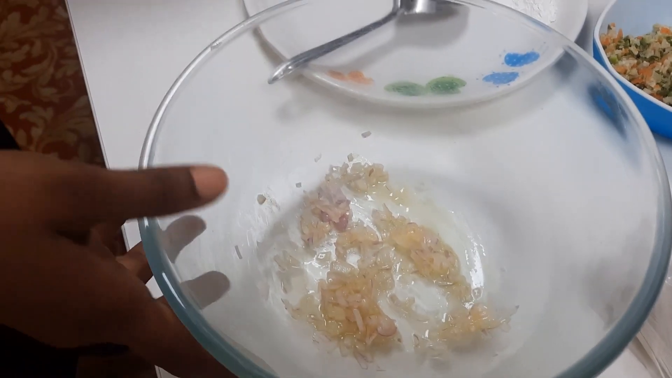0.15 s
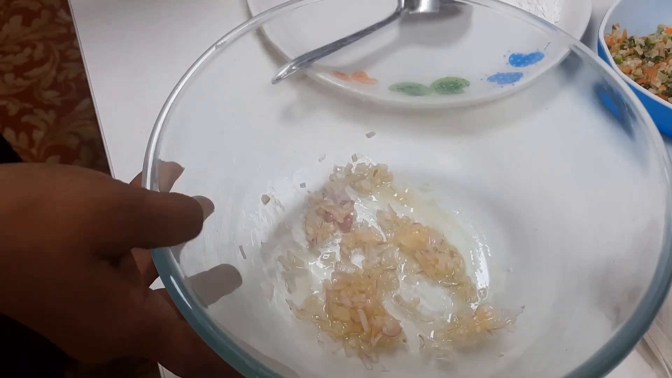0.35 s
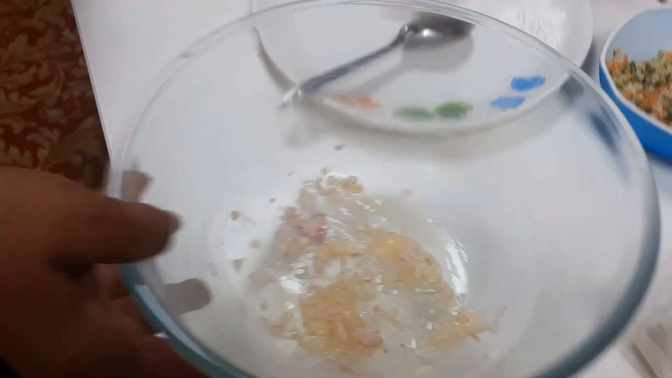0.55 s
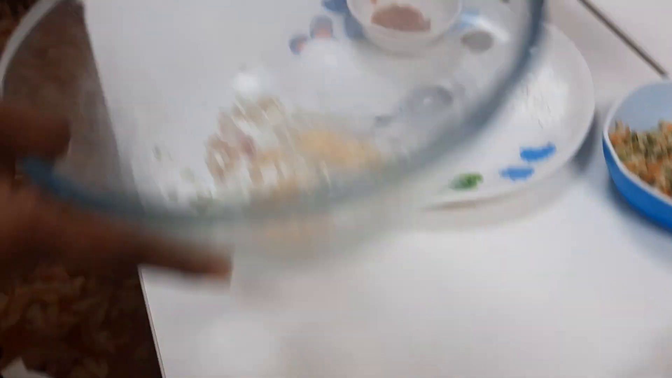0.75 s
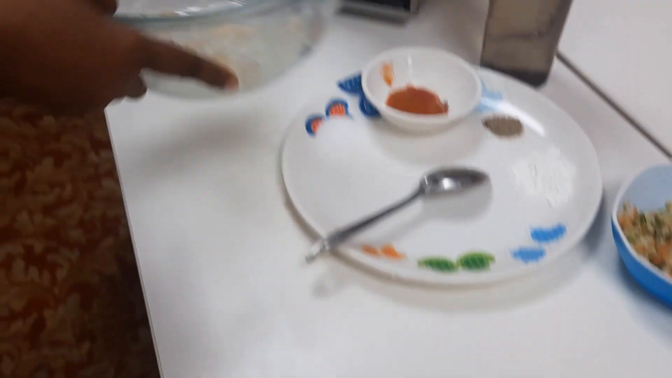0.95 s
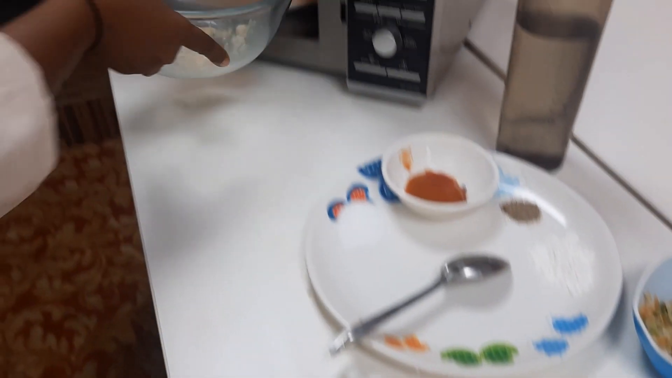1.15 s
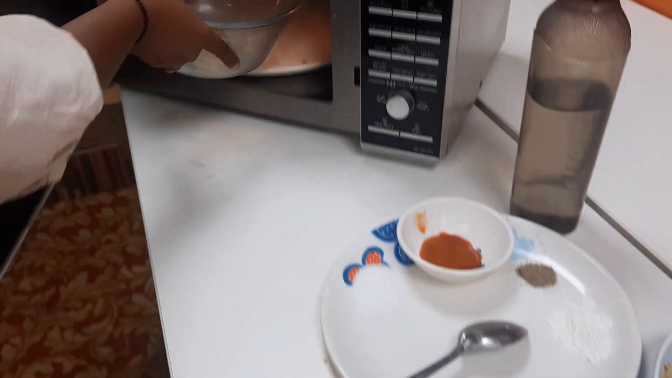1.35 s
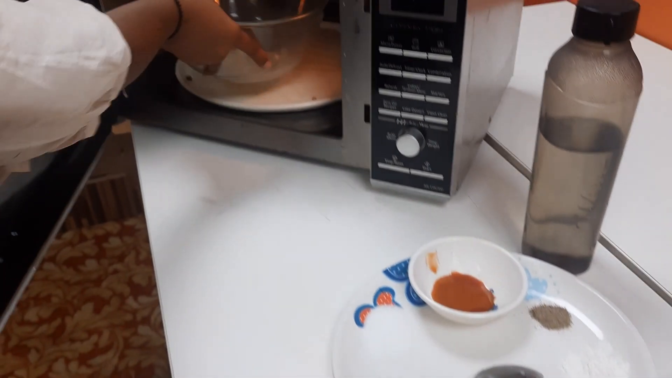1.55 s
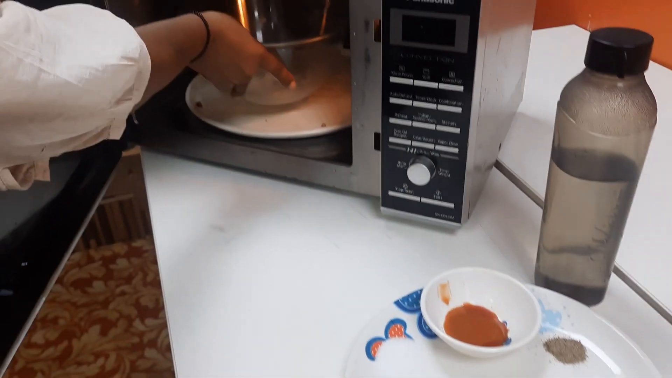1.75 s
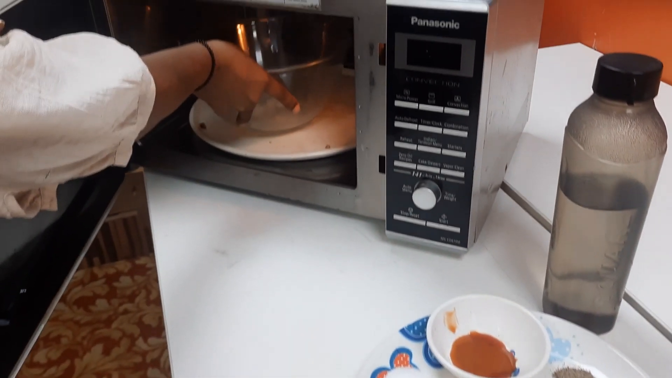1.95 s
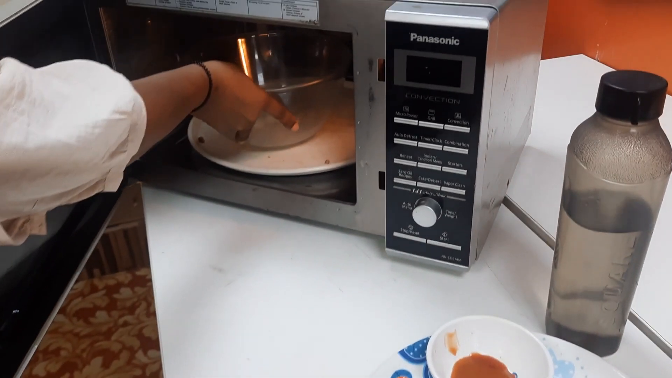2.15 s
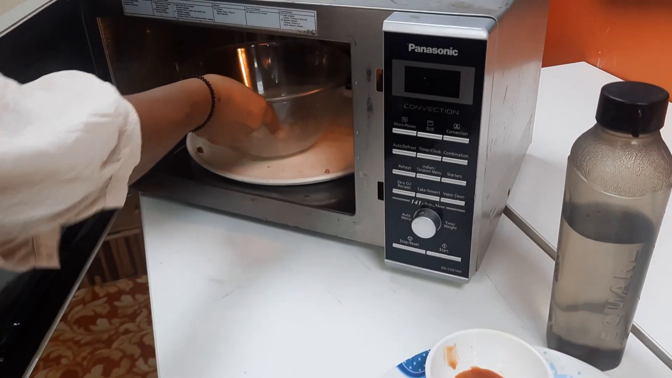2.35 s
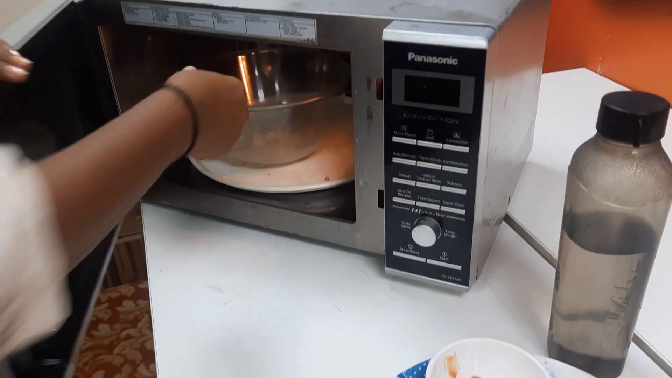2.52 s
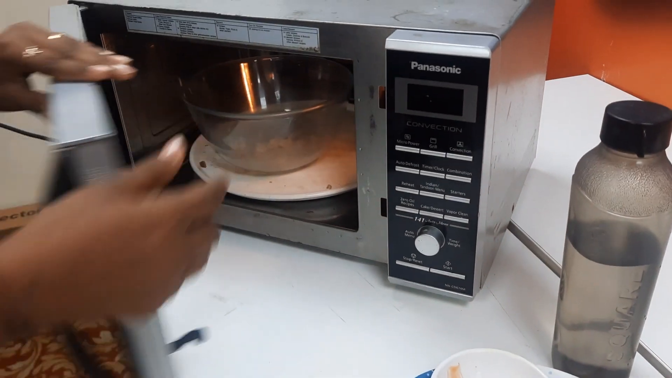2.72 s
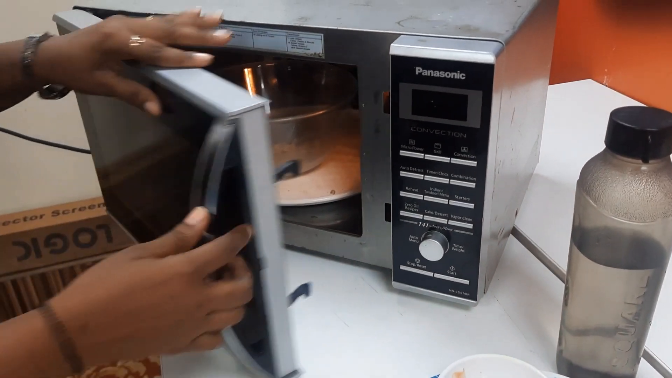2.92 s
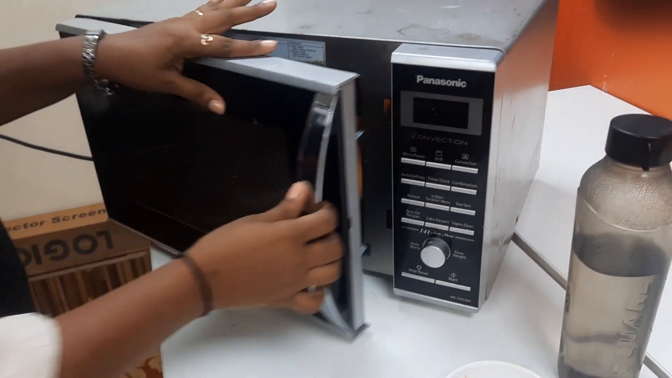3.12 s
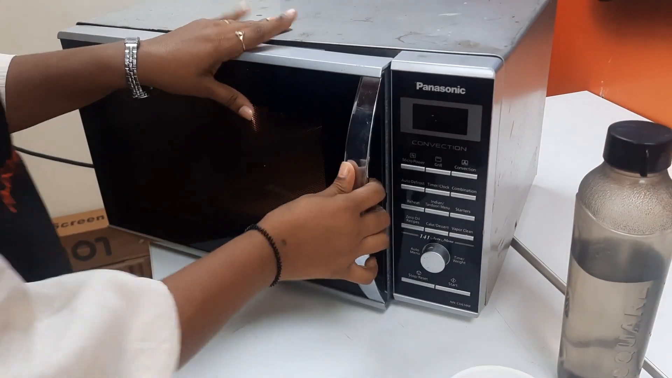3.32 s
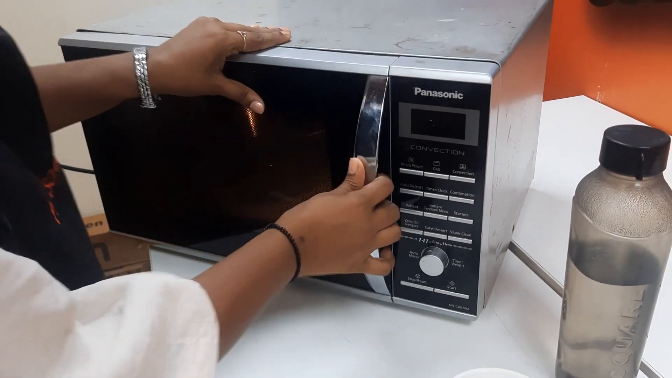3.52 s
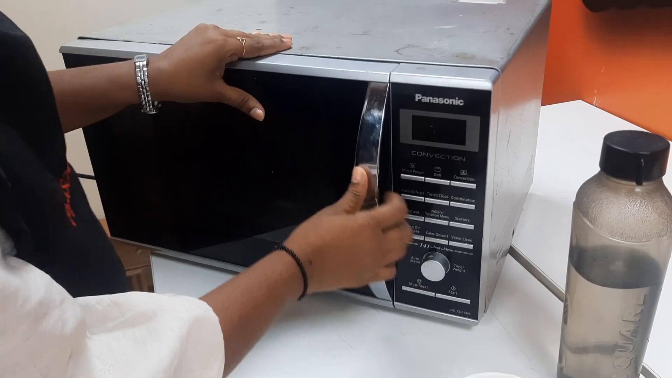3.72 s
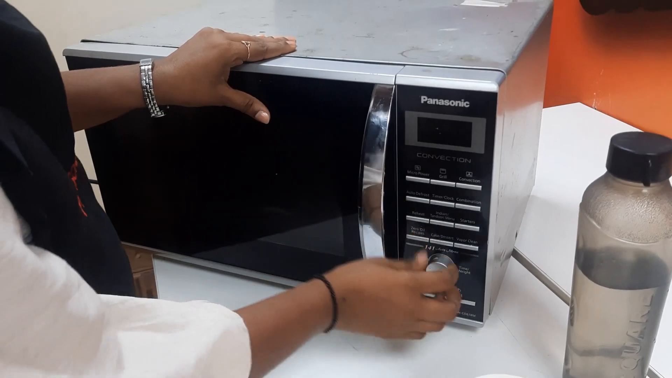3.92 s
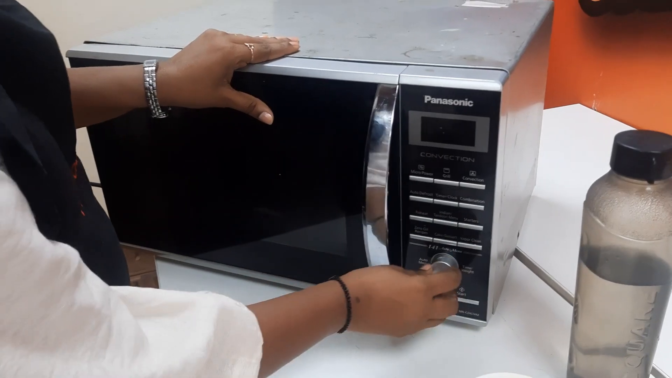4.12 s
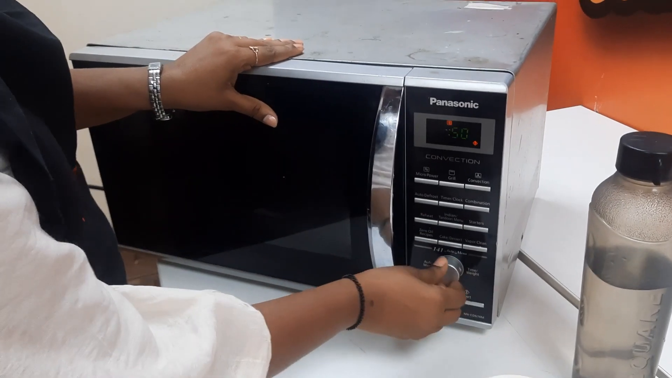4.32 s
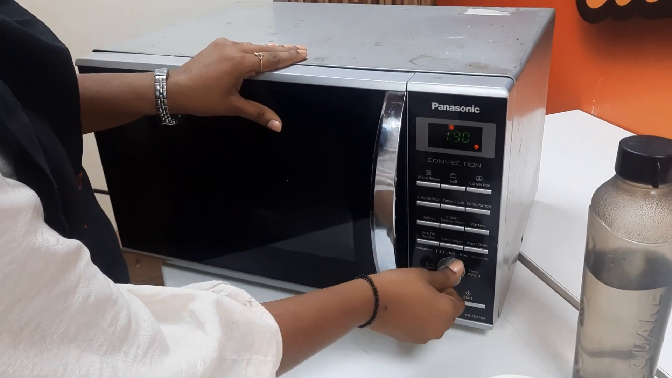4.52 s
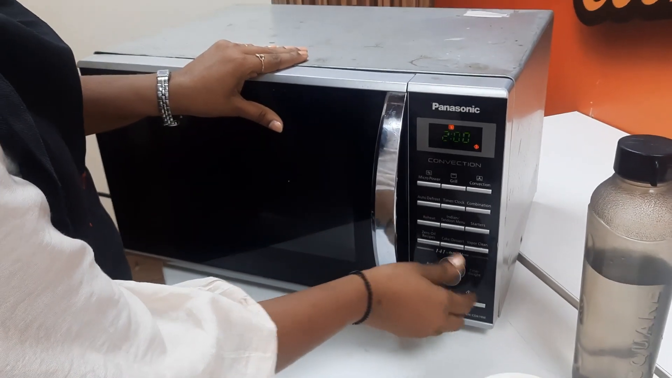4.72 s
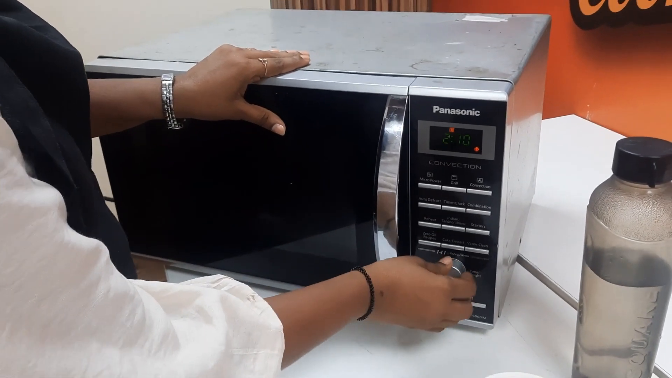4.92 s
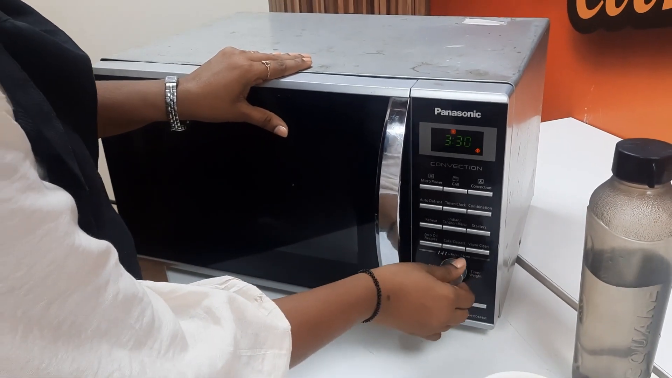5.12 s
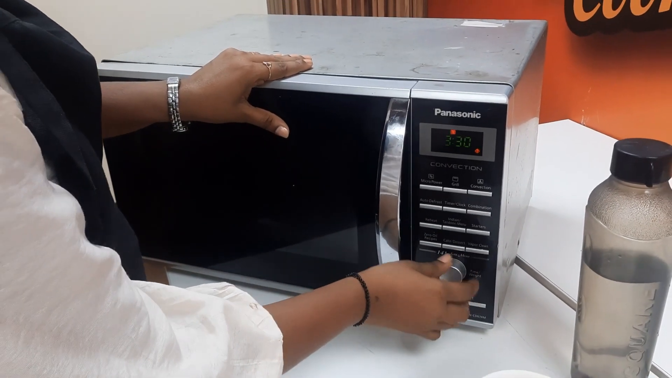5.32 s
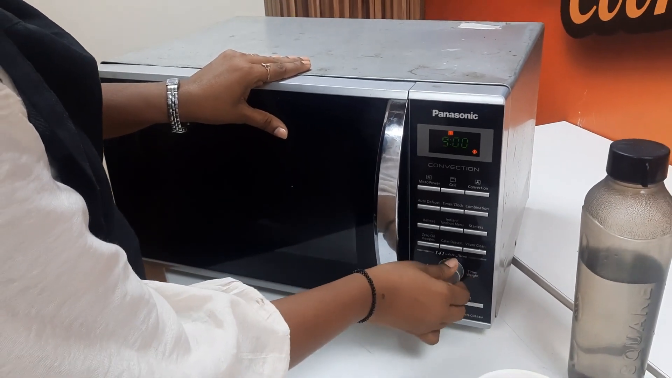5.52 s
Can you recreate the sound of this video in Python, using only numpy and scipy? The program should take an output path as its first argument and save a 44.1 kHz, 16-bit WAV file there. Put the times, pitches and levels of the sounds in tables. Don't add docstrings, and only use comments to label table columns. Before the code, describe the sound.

A glass bowl clunks and rocks onto a glass plate, then an oven door slams and a dial ticks faintly over a fridge hum.

```python
import sys
import numpy as np
from scipy import signal
from scipy.fft import rfft, irfft
from scipy.io import wavfile
from scipy.ndimage import uniform_filter1d

SR = 44100
rng = np.random.default_rng(int(sys.argv[2]) if len(sys.argv) > 2 else 0)


def transcribe(u):
    v = np.clip(np.atleast_2d(u).T, -1, 1)
    q = np.round(v * 32767).astype(np.int16)
    wavfile.write(sys.argv[1], SR, q)


def volts(x):
    e = np.asarray(x, float) / 20
    return 10 ** e


N = 250047

# pitch in Hz, level in dB per Hz.
AIR_COLOUR = [(20, -28), (34, -12), (70, -21), (101, 1), (126, -10), (233, -17), (292, -13.5), (317, -19.5),
              (419, -28), (1180, -45), (6650, -46.5), (15800, -49)]
# pitch in Hz, width in Hz, level in dB.
HUM_LINES = [(50, 11, -10), (64.5, 9.8, -11), (96, 7, -0.5), (290, 54, -10), (376, 14, -23),
             (1140, 12, -45.5), (2750, 20, -52.5)]
# pitch in Hz, left-right likeness from 0 to 1.
PORT_LIKENESS = [(60, 1), (180, 0.93), (400, .9), (700, 0.51), (1650, 0.18), (5000, 0.), (15000, 0.24)]

# start in seconds, hold in seconds, effort in dB, brightness in dB, low drag in dB.
RUB_STROKES = [(0.186, .01, -49, -9.5, -37), (0.271, .08, -61.5, 0, -46.5), (.412, .1, -55, -8, -49),
               (0.57, .02, -47, -12, -35.5), (0.722, .09, -61.5, -1, -46), (0.848, .03, -51.5, -2.5, -49.5),
               (1.02, .24, -82, 11, -66), (2.43, .11, -61, -10, -48), (2.628, .02, -53, -9, -61),
               (2.76, .11, -64, -6, -74), (2.994, .1, -60, -12.5, -47), (3.238, .07, -54, -10, -49),
               (3.359, .005, -39.5, -15.5, -37), (3.409, .1, -50.5, -14.5, -39),
               (3.545, .02, -35, -7.5, -37.5), (4.1, .18, -66, -28, -57), (4.521, .02, -57, -13, -60.5),
               (4.617, .03, -58, -18, -60), (5.029, .03, -56.5, -14.5, -54.5), (5.52, .08, -58, -12, -55)]
# start in seconds, hold in seconds, effort in dB,
# brightness in dB, low drag in dB.
DOOR_SHIVER = (3.7, .03, -39.5, -20, -35)
# pitch in Hz, level in dB per Hz.
RUB_BODY = [(400, -31), (700, 7.5), (1300, 7.5), (2200, 2.5), (3000, -6.5), (15500, -38)]
# pitch in Hz, level in dB per Hz.
RUB_HISS = [(2200, -29), (3500, 0.5), (6500, 10), (9000, -5.5), (13000, -7), (15500, -4)]
# pitch in Hz, level in dB per Hz.
RUB_DRAG = [(60, -29), (130, 0.5), (280, 4.5), (400, -4.5), (600, -7), (1000, -50.5)]

# start in seconds, peak in dB, pitch in Hz, time to fall 60 dB in seconds.
SOFT_PUSHES = [(0.031, -26, 152.5, 0.48), (.075, -43.5, 4493, .4), (.56, -24, 397, .08),
               (0.58, -33.5, 361, 0.21), (0.567, -45, 996, 0.097), (.836, -49, 3150, .12),
               (1.31, -45, 386, 0.19), (2.077, -11, 711, .05), (2.172, -10, 701, 0.021),
               (2.179, -12.5, 781.5, 0.045), (2.175, -18, 323, 0.17), (2.271, -22, 300, 0.21),
               (2.323, -23, 300, 0.23), (2.563, -56, 6500, .03), (2.991, -38.5, 356, 0.11),
               (3.43, -29, 151.2, 0.33), (3.518, -27, 152, 0.23), (3.5655, -5, 153.8, 0.11),
               (3.581, -19, 144, .09), (3.601, -12.5, 323, .27), (4.775, -67, 590, .45),
               (5.422, -67, 1900, .09), (4.981, -45, 1700, 0.047), (5.47, -40, 106.7, .5),
               (5.549, -38.5, 103.3, 0.35)]

# start in seconds, peak in dB, ring over rattle in dB,
# hardness in dB gained over four octaves, decay factor.
CUTLERY_HITS = [(0.003, -32, -12, 5, 0.9), (0.013, -22.5, -6.5, 6.5, 1), (0.036, -14.5, -7, 10, 0.96),
                (0.043, -14, 4, 7.5, 0.69), (0.074, -18, -10.5, -3, 0.9), (0.099, -17, -3, -5.5, 0.87)]
# start in seconds, peak in dB, ring over rattle in dB,
# hardness in dB gained over four octaves, decay factor.
LET_GO_HITS = [(2.54, -45, 3.5, 0.5, .8), (2.614, -36.5, 8.7, 9.7, .46)]
# start in seconds, peak in dB, ring over rattle in dB,
# hardness in dB gained over four octaves, decay factor.
TAP_HITS = [(1.299, -27, 6, 8, 0.95), (1.319, -38.5, -5.5, 2.1, .6)]
# start in seconds, peak in dB, ring over rattle in dB,
# hardness in dB gained over four octaves, decay factor.
BOWL_HITS = [
    (2.078, 4, 16.6, 5, 1),
    (2.139, -7.5, 9.4, -8, 0.53),
    (2.172, -13.5, 11, -8.5, 1),
    (2.228, -11.5, 12, -9, 0.72),
    (2.254, -17.5, 8, -5.5, 0.6),
    (2.272, -7, 12, -8, 0.88),
    (2.329, -23.5, 14, -3, 0.88),
]
# start in seconds, peak in dB, ring over rattle in dB,
# hardness in dB gained over four octaves, decay factor.
SLAM_HITS = [
    (3.568, -4.5, -3.5, 12, .9),
    (3.585, -6, 7, -5, 1),
]
# start in seconds, peak in dB, ring over rattle in dB.
COUNTER_HITS = [(0.363, -44.5, -15), (0.412, -40.5, -13.5), (0.553, -36, -3), (0.714, -43, -12),
                (0.754, -41.5, -8.5), (0.791, -40, -3), (0.829, -33, -12), (0.899, -41, -19)]
# start in seconds, peak in dB, ring over rattle in dB.
DOOR_HITS = [(2.9853, -47.5, -13), (3.016, -46, -10), (3.0494, -45, -8.5), (3.1872, -45.5, -12),
             (3.232, -42.5, -1), (3.2984, -42, -11), (3.3255, -15, 3), (3.4359, -38, -5), (3.4946, -37, -2),
             (3.5344, -19.5, -10.5), (3.6548, -23.5, -8.5), (3.7794, -38, -7.5), (3.8821, -48, 6),
             (3.9579, -45, -3)]
# start in seconds, peak in dB, ring over rattle in dB.
DIAL_HITS = [(4.303, -52, -6), (4.346, -50, -2), (4.477, -60, -1), (4.509, -45, -11), (4.567, -51, -11.5),
             (4.591, -44, 2), (4.615, -44, -8), (4.655, -49.5, 1), (4.885, -57, -14), (4.955, -56, -6),
             (4.984, -44.5, -3.5), (5.033, -42, -5), (5.106, -55, -2), (5.422, -57, 8), (5.479, -55, 0.5),
             (5.503, -43.5, -12), (5.553, -37, 3), (5.583, -42.5, 9.5)]

# pitch in Hz, level in dB, time to fall 60 dB in seconds.
CUTLERY_RING = [(220, -9.5, .3), (571, -6.5, .1), (1389, -3, .15), (3100, -1, 0.08), (4560, -11, .25),
                (4490, -2.5, 0.26)]
# pitch in Hz, level in dB, time to fall 60 dB in seconds.
COUNTER_RING = [(300, 17, 0.34), (353, -15, 0.12), (800, -3, 0.2), (1320, -12, 0.075), (5110, -14, .05)]
# pitch in Hz, level in dB, time to fall 60 dB in seconds.
TAP_RING = [(990, -9, 0.08), (3100, 0.5, 0.07), (4200, -2, 0.06), (5230, 5, 0.057), (7100, -9.5, .05)]
BOWL_HZ = [245, 300, 447, 597, 661, 712, 803, 1126, 1269, 1341, 1577, 1740, 2060, 2153, 2380, 2570, 3240,
           4938, 5663, 6002, 6476, 6900, 7564, 8177, 9830, 11680, 12100, 12380, 14150, 14850]
# level in dB, time to fall 60 dB in seconds.
BOWL_RING = [(-12, 0.18), (-14, 0.5), (-21, 0.46), (-14.5, 0.22), (-5, 0.1), (2, 0.11), (0, .12),
             (-6.5, 0.55), (-13.5, 0.31), (-5, .15), (-19.5, .12), (-12.5, .1), (-20, 0.42), (-1, 0.12),
             (-18, 0.42), (-14.5, 0.072), (-4, 0.14), (-13.5, 0.2), (-27, 0.11), (-23.5, 0.16), (-27, 0.22),
             (-15, 0.17), (-26, .3), (-27, .25), (-30.5, 0.22), (-36, 0.26), (-32, .18), (-31, .22),
             (-29.5, .17), (-34, .17)]
# pitch in Hz, level in dB, time to fall 60 dB in seconds.
DOOR_RING = [(136.2, 0.5, 0.44), (210, -13.5, 0.28), (323, 8, 0.25), (367, -9, 0.091), (808, -7.5, .1),
             (1170, -21, .08), (1700, -6.5, 0.16)]
# pitch in Hz, level in dB, time to fall 60 dB in seconds.
SLAM_RING = [(70, -6, 1.06), (130, -11, 0.7), (208, 4, 0.24), (282, -7.5, 0.28), (400, -2, 0.13),
             (463, -21, 1.1), (592, -12.5, 0.58), (873, -12.5, 0.67), (1000, 0.5, 0.056), (2790, -26, 0.95),
             (3230, -36, 0.9), (3810, -18, 1.05)]
# pitch in Hz, level in dB, time to fall 60 dB in seconds.
DIAL_RING = [(1170, -6, 0.05), (1240, -9, 0.074), (1525, -16, .05), (1934, -7, 0.094)]

# pitch in Hz, level in dB per Hz.
CUTLERY_WASH = [(60, -21.5), (110, -14.5), (200, -2.5), (570, -10.5), (750, -15.5), (1420, -14),
                (2200, -13), (2800, -20), (4520, -17.5), (9500, -31), (15500, -41.5)]
# pitch in Hz, level in dB per Hz.
COUNTER_WASH = [(35, -41), (60, -7.5), (327, -2), (376, -13.5), (810, -26.5), (3120, -20.5), (7540, -25.5),
                (9300, -38), (15500, -46)]
# pitch in Hz, level in dB per Hz.
TAP_WASH = [(120, -44), (200, -15), (385, -6.5), (742, -19.5), (798, -10), (1050, -10.5), (2500, -27),
            (4260, -14), (6240, -23.5), (7760, -16), (9310, -34.5), (12700, -24), (15500, -33)]
# pitch in Hz, level in dB per Hz.
BOWL_WASH = [(100, -41), (300, -9), (500, -14.5), (750, -4.5), (1000, -18.5), (2300, -17), (2900, -27),
             (6700, -32), (8800, -49.5), (15500, -56)]
# pitch in Hz, level in dB per Hz.
DOOR_WASH = [(35, -35.5), (60, -23.5), (335, -1.5), (475, -5), (1230, -7), (3580, -17.5), (7030, -20),
             (9510, -35), (15500, -39)]
# pitch in Hz, level in dB per Hz.
SLAM_WASH = [(53, -58.5), (95, -25), (145, -2), (254, -13.5), (322, -1.5), (436, -18.5), (799, -22.5),
             (2160, -27.5), (2570, -33.5), (6950, -39), (9610, -52), (15800, -52.5)]
# pitch in Hz, level in dB per Hz.
DIAL_WASH = [(240, -49), (400, -11.5), (1000, -4.5), (1170, 2), (1490, -9), (1990, -3.5), (2280, -30),
             (3680, -21), (6990, -41), (15500, -40)]
# pitch in Hz, time to fall 60 dB in seconds.
WASH_T60 = [(100, 0.75), (300, 0.6), (1000, 0.46), (3000, 0.34), (8000, 0.26), (15000, .3)]


def evened(x):
    return x / np.sqrt(np.mean(x ** 2) + 1e-20)


def colour_db(points, hz):
    f, db = np.transpose(points)
    return np.interp(np.log(hz + 1), np.log(f + 1), db, left=db[0] - 20)


def between(points, hz):
    f, value = np.transpose(points)
    return np.interp(np.log(hz + 1), np.log(f), value)


def octaves(hz):
    return np.log2(np.maximum(hz, 50) / 1000)


def add(mix, s, sound):
    part = mix[:, round(s * SR):][:, :sound.shape[1]]
    part += sound[:, :part.shape[1]]


def noise(count, size, level_db):
    frames = 4 * count // size + 6
    hz = np.fft.rfftfreq(size, 1 / SR)[:, None]
    a, b, c, d = rng.standard_normal((frames, len(hz), 4)).T
    left, other = a + 1j * b, c + 1j * d
    same = np.clip(between(PORT_LIKENESS, hz), -1, 1)
    right = same * left + np.sqrt(1 - same ** 2) * other
    s = np.arange(frames) * size / 4 / SR
    spectra = np.array([left, right]) * volts(level_db(hz, s))
    return signal.istft(spectra, nperseg=size, noverlap=3 * size // 4)[1][:, :count]


def kitchen():
    def hum_db(hz, s):
        power = 0
        for centre, width, db in HUM_LINES:
            power = power + volts(db) / (1 + (2 * (hz - centre) / width) ** 2) / np.sqrt(width)
        return 20 * np.log10(power)

    air = volts(-60) * evened(noise(N, 2048, lambda hz, s: colour_db(AIR_COLOUR, hz)))
    hum = volts(-58) * evened(noise(N, 16384, hum_db))
    return (air + hum) * volts([[1.2], [-1.2]])


def strokes(rows, fade_db_per_s):
    rise_db_per_s = 520
    t = np.arange(0, N + 64, 64) / SR
    s, hold, db = np.transpose(rows)[:, :, None]
    before = np.maximum(s - t, 0)
    after = np.maximum(t - s - abs(hold), 0)
    lost_db = rise_db_per_s * before + fade_db_per_s * after
    power = (volts(db - lost_db) ** 2).sum(0)
    return np.interp(np.arange(N) / SR, t, power)


def rubbing():
    def layer(colour):
        return evened(noise(N, 512, lambda hz, s: colour_db(colour, hz)))

    def level(pick, fade_db_per_s, shiver_db_per_s):
        hand = strokes([pick(*row) for row in RUB_STROKES], fade_db_per_s)
        door = strokes([pick(*DOOR_SHIVER)], shiver_db_per_s)
        return np.sqrt(hand + door)

    slips = volts(1.5 * evened(uniform_filter1d(rng.standard_normal(N), 180)))
    body = level(lambda s, hold, effort, bright, drag: (s, hold, effort), 170, 61)
    hiss = level(lambda s, hold, effort, bright, drag: (s, hold, effort + bright), 170, 61)
    drag = level(lambda s, hold, effort, bright, drag: (s, hold, drag), 89, 42)
    grainy = slips * (body * layer(RUB_BODY) + hiss * layer(RUB_HISS))
    return volts(-2.5) * (grainy + drag * layer(RUB_DRAG))


def thud(s, peak_db, hz, t60):
    t = np.arange(int(t60 * SR)) / SR
    swell_s = 0.0022 + 1.1 / hz
    swell = (1 - np.exp(-(t / swell_s) ** 2)) * volts(-60 * t / t60)
    tone = swell / swell.max() * np.sin(2 * np.pi * hz * t)
    return s, volts(peak_db) * tone * volts([[1.3], [-1.3]])


def walls(x):
    echo_db, echo_t60 = -10, 0.22
    at = np.arange(60, 12000, 24) + rng.integers(0, 24, (3, 498))
    echoes = rng.choice([-1., 1.], at.shape) * volts(-60 * at / SR / echo_t60)
    taps = np.zeros((3, 12100))
    np.put_along_axis(taps, at, echoes, 1)
    taps = taps[:2] + 0.7 * taps[2]
    no_bass = signal.butter(2, 220, "high", fs=SR, output="sos")
    taps = signal.sosfilt(no_bass, taps / np.linalg.norm(taps[0]))
    return x + volts(echo_db) * signal.oaconvolve(x, taps, axes=1)[:, :N]


def knock(row, pan_db, modes, wash, crack_db, seconds):
    s, peak_db, ring_db, hard_db, decay = row
    decay = max(decay, 0.1)
    t = np.arange(int(seconds * SR)) / SR
    panels_db = 3.5 * rng.standard_normal((257, 1))

    def rattle_db(hz, s):
        start_db = colour_db(wash, hz) + panels_db + hard_db / 4 * octaves(hz)
        return start_db - 60 * s / (between(WASH_T60, hz) * decay)

    rattle = noise(len(t), 512, rattle_db)
    start_level = np.sqrt(np.mean(rattle[:, :900] ** 2))
    crack = volts(crack_db) * np.exp(-t / 0.0005)
    rattle *= (1 + crack + 0.48 * np.exp(-t / 0.021)) / start_level

    hz, db, ring_s = np.transpose(modes)[:, :, None]
    skew, spot = rng.uniform(-1, 1, (2, *hz.shape))
    skew = np.sign(skew) * np.minimum(hz / 1500, 1) * 0.65
    size = volts(db + hard_db / 4 * octaves(hz) + 1.5 * spot)
    size = volts(ring_db) * size / np.linalg.norm(size)
    size = size * volts(-60 * t / (ring_s * decay))
    ring = np.array([(size * np.sin(2 * np.pi * hz * t + side * skew)).sum(0) for side in (1, -1)])

    gain = volts(peak_db - 9.5) / np.hypot(1, volts(ring_db))
    gain = gain * volts([[pan_db / 2], [-pan_db / 2]]) * (1 - np.exp(-t / 0.00076))
    return s, gain * rattle, gain * ring


def knocks():
    bowl_modes = np.column_stack([BOWL_HZ, BOWL_RING])
    # hits, light touch (hardness in dB, decay factor), left over right in dB,
    # ringing modes, wash, crack in dB, length in seconds.
    bodies = [(CUTLERY_HITS, (), 2.2, CUTLERY_RING, CUTLERY_WASH, 1.5, 0.5),
              (COUNTER_HITS, (3.8, 1), 2.2, COUNTER_RING, COUNTER_WASH, 3, 0.4),
              (LET_GO_HITS, (), 6, COUNTER_RING, COUNTER_WASH, 3, 0.4),
              (TAP_HITS, (), 3.8, TAP_RING, TAP_WASH, 6, 0.4),
              (BOWL_HITS, (), 4, bowl_modes, BOWL_WASH, 6, 0.55),
              (DOOR_HITS, (4.4, 0.92), 2.8, DOOR_RING, DOOR_WASH, 4, 0.4),
              (SLAM_HITS, (), 2.5, SLAM_RING, SLAM_WASH, 3, 0.9),
              (DIAL_HITS, (2.8, 0.77), 4, DIAL_RING, DIAL_WASH, 7, 0.3)]
    rattles, rings = np.zeros((2, 2, N))
    for hits, touch, *body in bodies:
        for row in hits:
            s, rattle, ring = knock((*row, *touch), *body)
            add(rattles, s, rattle)
            add(rings, s, ring)
    for push in SOFT_PUSHES:
        add(rings, *thud(*push))
    no_rumble = signal.butter(3, 52, "high", fs=SR, output="sos")
    return signal.sosfilt(no_rumble, rattles + walls(rings))


def scene():
    return knocks() + kitchen() + rubbing()


def roll_off(x):
    return signal.sosfilt(signal.butter(12, 16590, fs=SR, output="sos"), x)


def record(dry):
    dry = np.array([np.roll(dry[0], 2), dry[1]])
    notch_hz, width_hz, notch_db = 9400, 540, -15.5
    hz = np.fft.rfftfreq(N, 1 / SR)
    notch = volts(notch_db * np.exp(-((hz - notch_hz) / width_hz) ** 2))
    port = irfft(rfft(dry) * notch, N)
    port = port / (1 + (port / 0.95) ** 12) ** (1 / 12)
    return roll_off(port)


dry = scene()
out = record(dry)
transcribe(out)
```